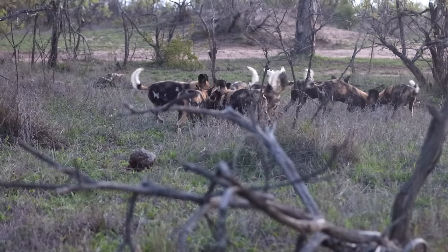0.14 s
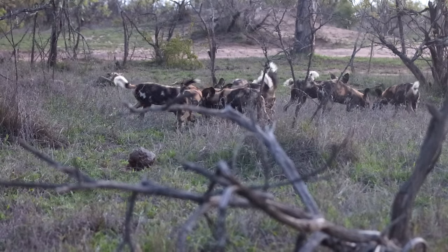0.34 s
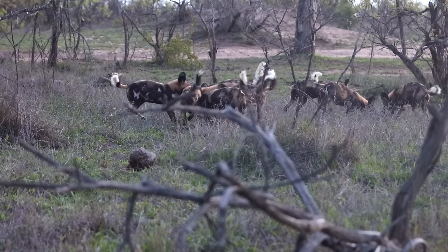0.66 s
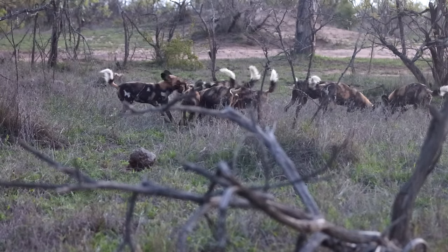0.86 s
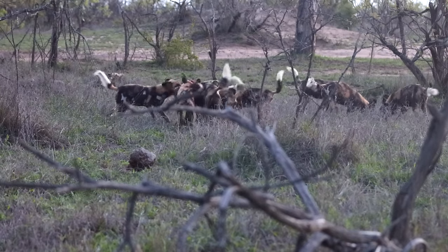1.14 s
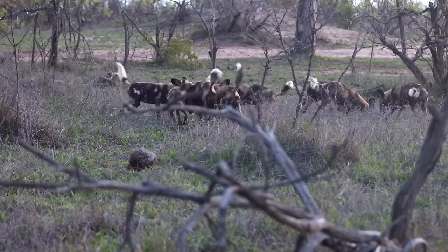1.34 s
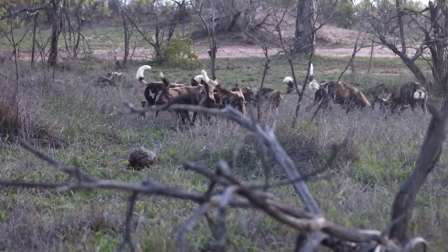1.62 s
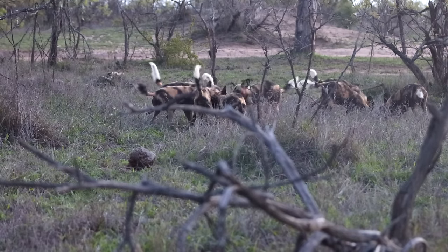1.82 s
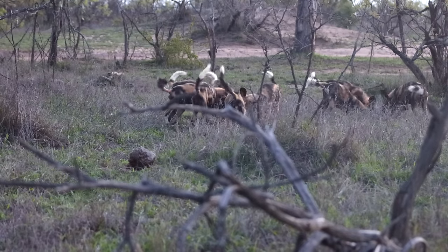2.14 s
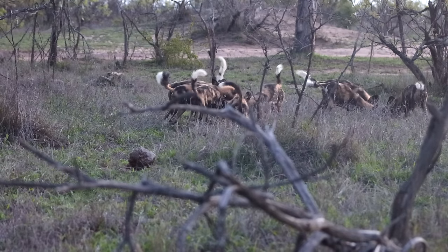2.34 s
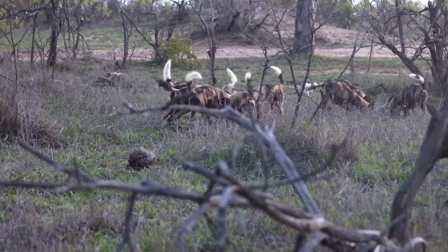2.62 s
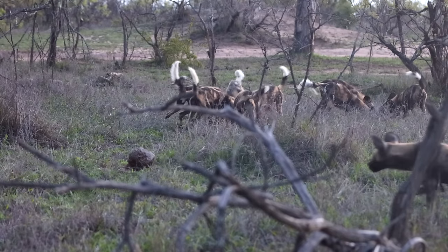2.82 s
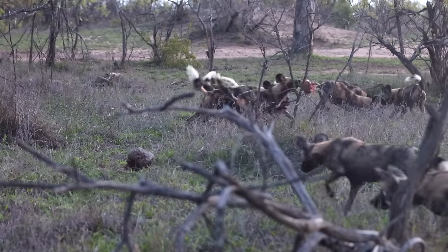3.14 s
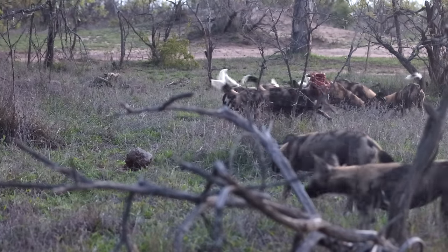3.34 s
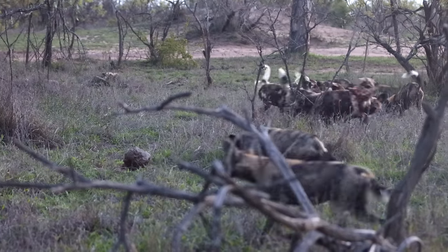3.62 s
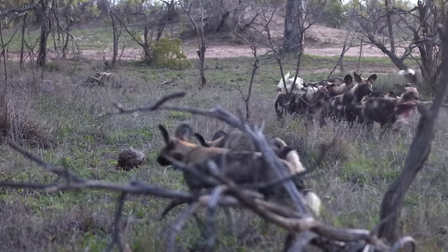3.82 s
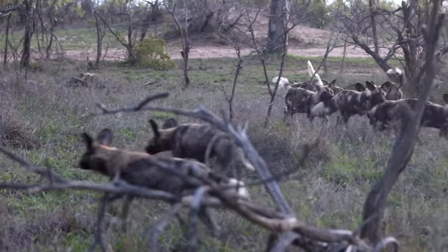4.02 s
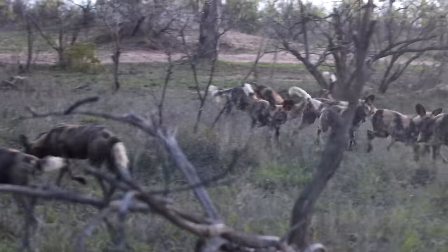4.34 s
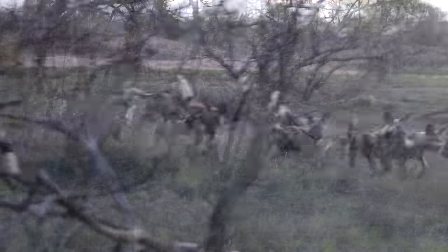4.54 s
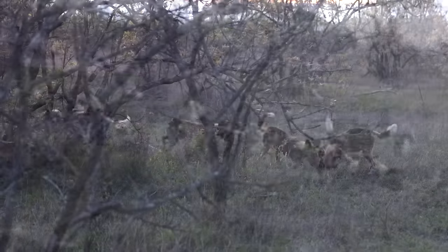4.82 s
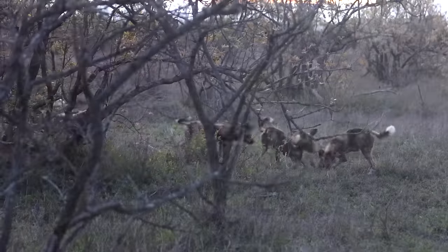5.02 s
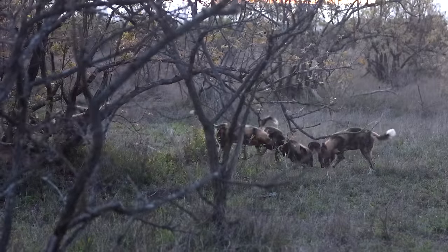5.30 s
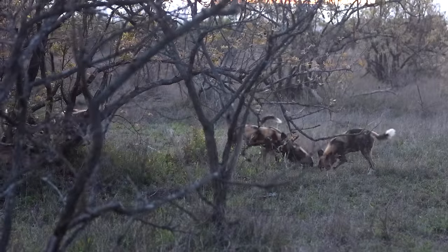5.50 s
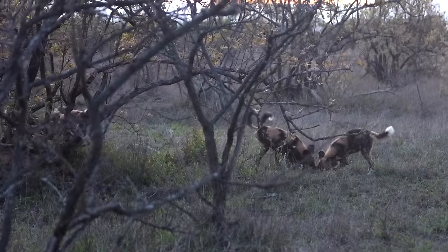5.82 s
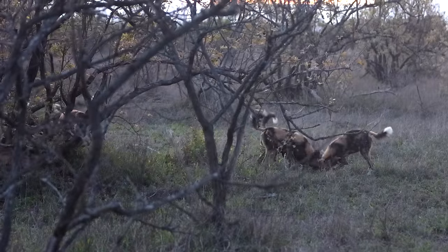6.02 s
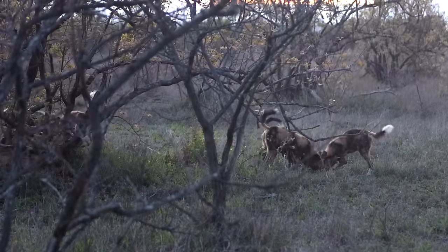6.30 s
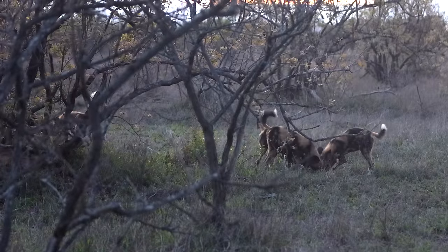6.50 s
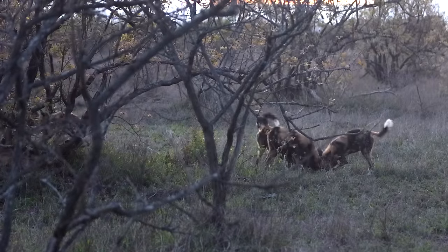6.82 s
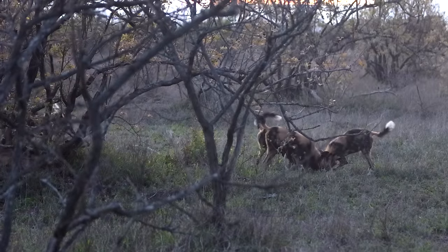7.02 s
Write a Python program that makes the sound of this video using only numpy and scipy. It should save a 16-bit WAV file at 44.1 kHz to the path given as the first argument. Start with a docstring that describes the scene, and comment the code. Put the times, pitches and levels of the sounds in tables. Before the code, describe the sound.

After a brief close knock and scrape, a wild dog pack bursts into frantic twittering and sharp squeals over crickets in dry bush, then calms.

```python
"""Dry bush, where a pack of wild dogs twitters over a kill: swooping whistles, short squeaks, a reedy whine.
Voices are gliding sines with overtones, near and echoed from the thicket; hoarse yelps are pulsed noise.
Grass, ground and snapping twigs are shaped noise; crickets trill in stroke pulses, and thin sines stand for
other insects. Near the start a loose part knocks as a set of decaying modes and scrapes as rough noise."""
import sys
import numpy as np
from scipy import signal
from scipy.fft import rfft, irfft, next_fast_len
from scipy.io import wavfile
from scipy.ndimage import map_coordinates

SR = 44100
rng = np.random.default_rng(int(sys.argv[2]) if len(sys.argv) > 2 else 0)


def wav_record(signal):
    """Record a signal, one row per channel, as 16-bit PCM in the file named by sys.argv[1]."""
    frames = np.transpose(np.atleast_2d(signal))
    bounded = np.clip(frames, -1, 1)
    # unit amplitude maps onto the largest positive 16-bit level
    quanta = np.round(bounded * 32767).astype(np.int16)
    wavfile.write(sys.argv[1], SR, quanta)


N = 315756
TIME = np.arange(N) / SR
TOP_HZ = 15800
ATTACK_S, RELEASE_S = 0.0043, 0.0042  # of every voiced piece


def amp(db):
    """Decibels to amplitude gain."""
    return 10 ** (np.asarray(db) / 20)


def unit(x):
    """Normalisation of x to rms 1."""
    return x / np.sqrt(np.mean(x ** 2) + 1e-20)


def along(points, hz):
    """Interpolation of (frequency, value) points on a logarithmic frequency axis."""
    f, v = np.transpose(points)
    return np.interp(np.log(hz + 1), np.log(f + 1), v)


def gains(rows):
    """Envelopes: one gain per sample for each level column after the time."""
    s, *columns = np.transpose(rows)
    return [amp(np.interp(TIME, s, column)) for column in columns]


def wobble(rate, size=N):
    """Random modulation: a smooth curve through rate random knots a second."""
    knots = rng.standard_normal(int(size * rate / SR) + 4)
    return map_coordinates(knots, [np.arange(size) * rate / SR])


def filtered(x, response):
    """Linear filtering: the spectrum of x times a response of frequency."""
    m = next_fast_len(N + SR // 2)
    return irfft(rfft(x, m) * response(np.fft.rfftfreq(m, 1 / SR)), m)[:N]


def noise(spectrum):
    """Coloured noise: white noise through a spectral envelope, at rms 1."""
    return unit(filtered(rng.standard_normal(N), lambda hz: amp(along(spectrum, hz))))


def band(centre_hz, width_hz, size):
    """Broad resonance: noise of rms 1 under a single spectral peak."""
    hz = np.fft.rfftfreq(size, 1 / SR)
    peak = 1 / (1 + (2 * (hz - centre_hz) / width_hz) ** 2)
    return unit(irfft(rfft(rng.standard_normal(size)) * peak, size))


def add(track, s, x):
    """Superposition: x joins the track from time s."""
    part = track[max(round(s * SR), 0):][:len(x)]
    part += x[:len(part)]


def bush(x, early_db=-12, tail_db=-15, count=24):
    """Reverberation: ground and near trunks return quick echoes; the thicket adds a short tail."""
    # decay of the thicket: (frequency [Hz], t60 [s])
    decay_times = [(200, 0.26), (2000, 0.31), (8000, 0.36), (15000, 0.38)]
    hz, t, z = signal.stft(rng.standard_normal(SR // 2), SR, nperseg=256)
    decay = amp(-60 * t / along(decay_times, hz)[:, None])
    tail = signal.istft(z * decay, SR, nperseg=256)[1]
    echo = amp(tail_db) * tail / np.linalg.norm(tail)
    delays = (rng.uniform(.001, .025, count) * SR).astype(int)
    echo[delays] += amp(early_db) * rng.choice([-1, 1], count) / np.sqrt(count)
    return x + signal.fftconvolve(x, echo)[:N]


def gate(t):
    """Onset and offset: the attack, hold and release of a voiced piece."""
    ramp = np.minimum((t - t[0]) / ATTACK_S, (t[-1] - t) / RELEASE_S)
    return np.sin(np.pi / 2 * np.clip(ramp, 0, 1)) ** 2


def swoop(length, first_hz, middle_hz, last_hz, db, swell_db):
    """Frequency glide: pitch and gain of a piece with one smooth bend, growing or fading evenly."""
    t = np.arange(0, length, 1 / SR)
    bend = np.polyfit([0, .5, 1], np.log([first_hz, middle_hz, last_hz]), 2)
    pitch = np.exp(np.polyval(bend, t / length))
    return pitch, amp(db) * unit(gate(t) * amp(swell_db * t / length))


def warble(knots):
    """Frequency modulation: pitch and gain along a swinging curve, as the larynx eases into each turn."""
    s, hz, db = np.transpose(sorted(knots))
    t = np.arange(s[0] - ATTACK_S / 2, s[-1] + RELEASE_S / 2, 1 / SR)
    place = np.interp(t, s, np.arange(len(s)))
    slope = np.diff(hz) / np.maximum(np.diff(s), 1e-4)
    # the pitch is level wherever it changes direction
    inner = 2 * np.maximum(slope[:-1] * slope[1:], 0) / (slope[:-1] + slope[1:] + 1e-9)
    turn = np.r_[slope[0], inner, slope[-1]]
    i = np.minimum(place.astype(int), len(s) - 2)
    u = place - i
    bend = (turn[i] - slope[i]) * (1 - u) - (turn[i + 1] - slope[i]) * u
    pitch = hz[i] + np.diff(s)[i] * u * (slope[i] + (1 - u) * bend)
    return pitch, gate(t) * amp(np.interp(t, s, db))


def voice(pitch, gain, overtones_db, jitter, jitter_rate, shimmer_db):
    """Source and filter: a trembling harmonic source whose overtones the mouth colours."""
    # resonance of the mouth: (frequency [Hz], level [dB])
    mouth_colour = [(1000, 2), (2800, 2.5), (4300, 7), (6300, 3.5), (8300, 4.5), (10500, -7), (13000, 1.5),
                    (15500, -11)]
    pitch = pitch * (1 + jitter * wobble(jitter_rate, len(pitch)))
    phase = 2 * np.pi * np.cumsum(pitch) / SR

    def flutter():
        """Shimmer: random amplitude modulation of one partial."""
        return amp(shimmer_db * wobble(jitter_rate, len(pitch)))

    out = np.sin(phase) * flutter()
    for k, level in enumerate(overtones_db, 2):
        colour = amp(level + along(mouth_colour, k * pitch))
        out += colour * flutter() * np.sin(k * phase) * (k * pitch < SR / 2)
    return np.sqrt(2) * out * gain


def excitement(s):
    """Arousal: how far the pack is above calm at time s, in dB."""
    # excitement of the pack: (time [s], level [dB])
    arousal = [(0, -70.5), (2.9, -61.5), (3.25, -47), (3.8, -43), (4.35, -41), (4.55, -47.5), (5.2, -49.5),
               (5.5, -63.5), (7.16, -62)]
    calm_db = -58
    return np.interp(s, *np.transpose(arousal)) - calm_db


def air_stir():
    """Low-frequency noise: a slowly varying stir of the air."""
    # strength of the stir: (time [s], level [dB])
    stir_levels = [(0, -53), (.28, -48.5), (.45, -54.5), (1.5, -65), (3.9, -56), (4.2, -54.5), (5.4, -52.5),
                   (7.16, -51)]
    # its spectrum: (frequency [Hz], relative level per Hz [dB])
    stir_spectrum = [(12, -44), (20, 8), (49, -2.5), (118, 3), (188, -0.5), (260, -6), (350, -7),
                     (460, -17), (770, -120)]
    return gains(stir_levels)[0] * noise(stir_spectrum)


def scuffle(grain_db=2, thud_db=-1, thud_rate=70, thud_t60=0.022, body_db=-7, body_hz=95):
    """Friction and impact: stalks brush the dogs; paws stir the ground and land in irregular dull thuds."""
    # activity of the pack: (time [s], grass swish level [dB], trampling level [dB])
    activity = [(0, -45.5, -50.5), (.6, -53, -53), (1, -47, -52), (1.25, -54, -53), (2.1, -52, -52),
                (2.5, -53, -52.5), (3.35, -50, -53.5), (4, -51, -50), (4.3, -42, -49.5), (4.55, -47, -50),
                (4.85, -51, -55), (5.5, -54.5, -55), (6.5, -52, -51.5), (7.16, -53.5, -52.5)]
    # spectra of the grass and of the stirred ground: (frequency [Hz], relative level per Hz [dB])
    grass_spectrum = [(800, -38), (1500, 0.5), (1950, 0), (2900, -4), (4800, -4), (6500, -8), (8500, -5.5),
                      (10500, -12.5), (13500, -10), (15800, -10.5)]
    ground_spectrum = [(88, -9.5), (150, -8), (188, 4), (225, -6), (454, -10), (900, -8), (1830, -11),
                       (3150, -24), (3500, -14.5), (4550, -16.5), (7700, -120)]
    swish, tread = gains(activity)
    stalks = unit(noise(grass_spectrum) * amp(grain_db * wobble(500) + wobble(25)))
    steps = (rng.random(N) < thud_rate / SR) * rng.uniform(0.084, 1, N)
    earth = band(327, 520, N) + amp(body_db) * band(body_hz, 60, N)
    decay = amp(-60 * np.arange(SR // 10) / SR / thud_t60)
    thuds = unit(signal.fftconvolve(steps, decay)[:N] * earth)
    # the harder the trampling, the more the thuds stand out
    weight = (tread / tread.max()) ** 2
    return swish * stalks + tread * (noise(ground_spectrum) + amp(thud_db) * weight * thuds)


def chirps(cycle, pitch_hz, sweep, jitter):
    """Stridulation: one wing stroke a cycle, each falling in pitch."""
    u = cycle % 1
    pitch = pitch_hz * (1 + sweep * (.5 - u) + jitter * wobble(400, len(u)))
    return unit(np.sin(np.pi * u) ** 4 * np.sin(2 * np.pi * np.cumsum(pitch) / SR))


def crickets(stroke_rate=33.5, chorus_db=-53.0, bout_db=1.5, count=5):
    """Stridulation in chorus: far crickets rise and fall in a narrow band; nearer ones trill in bouts."""
    # near trills: (first chirp [s], last chirp [s], pitch [Hz], level before the swell [dB])
    near_trills = [(0.396, 0.495, 4040, -52.5), (0.667, 0.837, 4420, -52.5), (0.929, 1.045, 4110, -52.5),
                   (1.127, 1.27, 4170, -62), (1.549, 1.719, 4220, -57), (2.101, 2.19, 4020, -51),
                   (2.654, 2.743, 4050, -50), (2.754, 2.929, 4450, -50.5), (3.151, 3.294, 4040, -51.5),
                   (5.032, 5.152, 4430, -51), (5.17, 5.236, 4020, -45.5), (5.764, 5.823, 3930, -44),
                   (6.315, 6.428, 3940, -42.5), (6.883, 6.995, 4015, -42.5), (7.035, 7.16, 4430, -51)]
    # the common pitch; a near singer starts there and glides to its own
    chorus_hz, glide_s = 3968, 0.033

    def singer():
        """Stridulation of one far cricket, its pitch and loudness wandering."""
        cycle = stroke_rate * rng.uniform(.92, 1.12) * TIME + wobble(2)
        song = chirps(cycle, chorus_hz * (1 + .021 * wobble(9)), sweep=.16, jitter=.024)
        return song * amp(bout_db * np.tanh(wobble(4.6)))

    out = amp(chorus_db) * unit(sum(singer() for _ in range(count)))
    for first, last, pitch_hz, db in near_trills:
        # the higher singers stroke faster
        gaps = round((last - first) * stroke_rate * (pitch_hz / 4000) ** 3)
        rate = gaps / (last - first)
        cycle = np.arange(0, gaps + 1, rate / SR)
        swell = np.sin(np.pi * (cycle / (gaps + 1)) ** 1.4) ** .3
        pitch = pitch_hz + (chorus_hz - pitch_hz) * np.exp(-cycle / rate / glide_s)
        strokes = chirps(cycle, pitch, sweep=.2, jitter=.01)
        add(out, first - .5 / rate, amp(db) * swell * strokes)
    return out


def far_twitters(pitch_hz=6900, spread=.2, bend=0.21, length=.022, overtone_db=-9, level_db=-66,
                 scatter_db=3.5, swell_db=10):
    """Random point process: dogs further back whistle oftener and louder as the pack grows excited."""
    calls_per_s, doubling_db = 10, 5  # rate when calm; each such rise in excitement doubles it
    out = np.zeros(N)
    due = np.cumsum(calls_per_s * 2 ** (excitement(TIME) / doubling_db)) / SR
    draws = rng.standard_normal((600, 8))
    for k, (late, size, loud, swell, high, *turns) in enumerate(draws[:int(due[-1])]):
        s = np.interp(k + .5 + late / 2, due, TIME)
        pitches = np.minimum(pitch_hz * np.exp(spread * high + bend * np.array(turns)), TOP_HZ)
        db = level_db + excitement(s) + scatter_db * loud
        shape = swoop(length * np.exp(size / 4), *pitches, db, swell_db * swell)
        call = voice(*shape, [overtone_db], jitter=0.012, jitter_rate=276, shimmer_db=3.0)
        add(out, s - length / 2, call)
    return out


def snaps(cycles=22):
    """Damped resonance: twigs and paws crack and die within a few hundredths of a second, the higher the sooner."""
    # twigs snapping and paws striking: (time [s], nominal peak level [dB], centre [Hz], width [Hz])
    cracks = [(.183, -17, 3680, 1200), (1.948, -35, 1490, 2500), (2.041, -31, 12000, 6000),
              (2.76, -26.5, 1400, 2500), (3.0508, -20, 4000, 2760), (3.986, -34, 980, 500),
              (.404, -32, 11200, 2000), (4.068, -27, 1770, 4050), (4.254, -36, 480, 500),
              (4.287, -38.5, 606, 800), (4.505, -30, 800, 895), (4.353, -16, 7000, 7900),
              (4.352, -30.5, 328, 450), (4.566, -30, 1010, 1400), (5.248, -28.5, 1290, 2000),
              (5.249, -34, 7000, 9000), (5.802, -35, 10500, 5000), (5.986, -34.5, 450, 900),
              (6.885, -34.5, 845, 1200)]
    out, t = np.zeros(N), np.arange(SR // 10) / SR
    for s, db, centre_hz, width_hz in cracks:
        t60 = cycles / centre_hz + 0.012
        add(out, s, amp(db - 6.5 - 60 * t / t60) * band(centre_hz, width_hz, len(t)))
    return out


def knocks(attack=0.00033):
    """Modal vibration and friction: a loose part strikes and slides; its shifting grip bends the ring."""
    # blows: (time [s], nominal peak level [dB], added level of the main mode [dB], of the second mode [dB])
    blows = [(0.1834, -17.5, -21, -2), (0.2224, -17.5, -18, -1), (0.2266, -22.5, -18, 6),
             (.233, -22, -8, -5), (.268, -17, -11, -8), (0.272, -11, 5.5, -3), (0.2965, -22, -6, 5),
             (0.319, -36, -1, 11)]
    # modes of the part: (frequency [Hz], relative level [dB], t60 [s])
    modes = [(1134, -3, 0.04), (2440, -11.5, 0.028), (188, -15, 0.093), (270, -23.5, 0.076),
             (830, -17, 0.039), (1280, -8.5, 0.018), (1550, -5, 0.043), (3200, -17, 0.033),
             (3820, -19, 0.022)]
    # spectrum of the scrape: (frequency [Hz], relative level per Hz [dB])
    scrape_spectrum = [(35, -50), (60, -15), (188, -2), (406, -15), (816, -11), (1300, -2.5), (1800, -11),
                       (2740, -11), (4000, -14), (15800, -18)]
    slide_from_s, slide_to_s, slide_db, slide_t60_s = .184, 0.28, -35, 0.28
    out, t = np.zeros(N), np.arange(SR // 5) / SR
    for s, db, *leading_db in blows:
        strengths_db = rng.normal(0, 1.5, len(modes))
        strengths_db[:len(leading_db)] = leading_db
        grip = 1 + .015 * wobble(150, len(t))
        ring = np.zeros(len(t))
        for extra, (hz, level, t60) in zip(strengths_db, modes):
            ring += amp(level + extra - 60 * t / t60) * np.sin(2 * np.pi * hz * np.cumsum(grip) / SR)
        crack = amp(-11 - 60 * t / 0.01) * band(2600, 6000, len(t))
        add(out, s, amp(db) * (ring * (1 - np.exp(-t / attack)) + crack))
    fade_db = -60 * np.maximum(TIME - slide_to_s, 0) / slide_t60_s
    sliding = (TIME > slide_from_s) * amp(slide_db + fade_db)
    return out + sliding * unit(noise(scrape_spectrum) * amp(2.1 * wobble(1100)))


def rasps(pulse_rate=105):
    """Pulsed turbulence and friction: rough bursts swell and fade in uneven pulses that start sharply."""
    # hoarse yelps, scuffles, low thumps and a scrape after the knocks:
    # (middle [s], length at half height [s], centre [Hz], width [Hz], level [dB])
    bursts = [(0.361, .07, 1840, 1300, -46.5), (1.87, 0.052, 1460, 1000, -48.5),
              (1.963, 0.026, 1460, 1420, -43), (2.084, 0.059, 1700, 900, -44.5),
              (3.102, 0.035, 2720, 1870, -44), (3.391, 0.069, 2030, 1620, -37.5),
              (3.368, 0.029, 341, 130, -44), (3.591, 0.04, 1440, 1180, -39),
              (3.855, 0.05, 1530, 450, -38.5), (4.134, 0.12, 1170, 1200, -40.5),
              (4.157, 0.035, 344, 500, -42), (4.277, 0.033, 450, 450, -42), (4.355, 0.046, 3350, 4500, -35),
              (4.39, 0.041, 360, 500, -42), (4.385, .06, 1630, 1400, -42), (4.52, 0.028, 550, 1300, -42.5),
              (4.641, 0.02, 660, 1500, -45), (4.63, 0.12, 2560, 1800, -48.5),
              (4.709, 0.015, 500, 1000, -48), (4.83, 0.037, 237, 260, -47), (4.939, 0.012, 1780, 700, -37),
              (6.395, 0.058, 342, 200, -44.5), (6.587, 0.074, 1590, 500, -48.5)]
    out = np.zeros(N)
    for s, length, centre_hz, width_hz, db in bursts:
        size = int(2 * length * SR)
        cycle = np.cumsum(pulse_rate * np.exp(wobble(pulse_rate, size) / 2)) / SR
        pulses = amp(-15 * (cycle % 1))
        burst = unit(band(centre_hz, width_hz, size) * pulses)
        add(out, s - length, amp(db) * np.hanning(size) * burst)
    return out


def twitters(overtone_db=-18.0, third_db=-6, hoarse_db=-16, warble_db=-3.5):
    """Frequency-modulated whistles of near and deeper dogs: they flutter, and turbulence frays them."""
    # pieces of whistles, some running on into the next, one a bright overtone:
    # (time [s], length [s], first pitch [Hz], middle pitch [Hz], last pitch [Hz],
    # level [dB], swell over the length [dB])
    whistle_pieces = [(1.125, 0.08, 7360, 10160, 8880, -52, -24), (1.244, 0.06, 6640, 6920, 6700, -55, -11),
                      (1.961, 0.015, 3900, 4900, 6600, -47, 13), (1.98, 0.063, 6400, 6840, 7000, -53, -2),
                      (2.112, 0.042, 6600, 5170, 4220, -48.5, -7),
                      (2.151, 0.027, 4020, 5080, 5900, -50, -7),
                      (2.556, 0.047, 6810, 6740, 6440, -52.5, 11),
                      (2.881, 0.031, 5270, 5630, 6160, -49.5, 11),
                      (3.057, 0.018, 5300, 4240, 3610, -41.5, 0),
                      (3.101, 0.018, 3780, 4740, 8900, -39.5, -10),
                      (3.116, 0.0216, 9100, 8360, 8560, -40.5, 10),
                      (3.167, 0.043, 7000, 6400, 8350, -44, 19), (3.216, 0.032, 8000, 6300, 7220, -42, 1),
                      (3.26, 0.038, 7330, 5570, 5520, -38.5, 1), (3.32, 0.028, 6400, 4580, 4280, -39.5, -5),
                      (3.391, 0.015, 8300, 8100, 9180, -38.5, 6),
                      (3.408, 0.021, 7850, 5950, 3940, -32.5, -10),
                      (3.457, 0.027, 5420, 4200, 5400, -37.5, 9),
                      (3.511, 0.037, 6060, 4720, 4000, -40.5, 9),
                      (3.563, 0.05, 4270, 4620, 4320, -37.5, -6),
                      (3.637, 0.035, 7520, 5070, 6350, -34.5, 16),
                      (3.663, 0.039, 5580, 6440, 4640, -39.5, -16),
                      (3.788, 0.019, 9700, 7800, 6170, -41, -4),
                      (3.777, 0.045, 12600, 13400, 11900, -33.5, 5),
                      (3.807, 0.03, 8700, 5680, 4900, -35, 6), (3.818, 0.066, 4370, 4036, 5800, -33, -13),
                      (4.004, 0.02, 7700, 5330, 6990, -35.5, 16), (4.026, 0.02, 6800, 8140, 6300, -28, -7),
                      (4.048, 0.018, 4550, 4380, 5640, -36, -4), (4.084, 0.028, 8600, 5440, 3740, -36, -3),
                      (4.308, 0.018, 5580, 8670, 14910, -29, -20),
                      (4.355, 0.022, 4300, 5300, 6460, -32, -4),
                      (4.385, 0.035, 6430, 10250, 6840, -36.5, -11),
                      (4.415, 0.021, 5400, 4360, 6000, -27, 3),
                      (4.417, 0.022, 7330, 6140, 10500, -28.5, 13),
                      (4.418, .018, 15200, 12400, 15300, -32.5, 2),
                      (4.447, 0.028, 8230, 8200, 5750, -40, -3),
                      (4.532, 0.017, 12700, 11700, 11100, -45.5, 3),
                      (4.557, 0.027, 4900, 4570, 4680, -44.5, -2), (4.618, 0.011, 5540, 5260, 6800, -38, 2),
                      (4.584, 0.014, 4300, 5800, 10000, -43, -2), (4.597, 0.021, 9900, 8360, 9700, -30, 12),
                      (4.632, 0.01, 5240, 5000, 5200, -36.5, 0),
                      (4.646, 0.012, 5100, 5120, 6100, -31.5, -6),
                      (4.647, 0.033, 7260, 9080, 8550, -29.5, 6),
                      (4.676, 0.013, 8640, 4950, 4000, -35.5, -9),
                      (4.686, 0.0248, 4070, 3920, 4240, -33.5, 12),
                      (4.703, 0.018, 6800, 7800, 12090, -42, -7), (4.738, 0.02, 8400, 6270, 7700, -39, -14),
                      (4.772, 0.043, 6770, 14300, 12500, -36, -27),
                      (4.816, 0.021, 6450, 4350, 4740, -38, 8.5),
                      (4.915, 0.012, 8100, 7240, 8500, -42.5, 0), (4.97, 0.018, 4820, 4700, 7800, -46, -5),
                      (5.048, 0.11, 7480, 8900, 8000, -59, -4), (5.18, 0.016, 8670, 7640, 5810, -49, -8),
                      (5.205, 0.05, 8300, 7900, 8540, -57, 3), (5.668, 0.059, 7100, 7500, 6900, -59.5, -1),
                      (5.285, .016, 8100, 7400, 6700, -52.5, 2), (5.785, .024, 6650, 5700, 4800, -56, 3),
                      (6.088, .032, 5300, 5650, 4850, -56, 2.5), (5.92, 0.033, 5770, 4770, 4400, -43.5, -8),
                      (5.968, 0.05, 3840, 5180, 7000, -52, -26),
                      (6.292, 0.015, 6330, 5240, 4130, -39.5, -4.5),
                      (6.333, 0.012, 3760, 5400, 6350, -31, -7), (6.342, 0.054, 6060, 6920, 6700, -44, -13),
                      (6.469, 0.04, 6110, 8250, 6400, -47, -3), (6.507, 0.022, 6000, 7740, 8290, -46, 0.5),
                      (6.577, 0.057, 8340, 8670, 8100, -46.5, -21)]
    # swinging whistles as curves; one long call runs through two of them:
    # (time [s], pitch [Hz], level before warble_db [dB])
    whistle_curves = [
        [(1.997, 7590, -44), (2.009, 8840, -24.5), (2.027, 10400, -53), (2.038, 7300, -33), (2.045, 5030, -26),
         (2.06, 5430, -30), (2.078, 6750, -31.5), (2.112, 7030, -36)],
        [(3.298, 10200, -40), (3.322, 6160, -44), (3.344, 9000, -34), (3.365, 12100, -35.5), (3.378, 8900, -43),
         (3.4, 4300, -35)],
        [(3.601, 13000, -41), (3.61, 7000, -26), (3.622, 4550, -34), (3.7, 4200, -44), (3.73, 4700, -28.5),
         (3.755, 4400, -31), (3.772, 5650, -23), (3.785, 7500, -36)],
        [(3.897, 4500, -27), (3.906, 7500, -20.5), (3.913, 6280, -27), (3.921, 9520, -21.5),
         (3.944, 8600, -25.5), (3.956, 6860, -27)],
        [(4.102, 6370, -31), (4.113, 5950, -26.5), (4.13, 7530, -26.5), (4.147, 3990, -24), (4.175, 5400, -33)],
        [(4.114, 6950, -30), (4.125, 8300, -21), (4.14, 10100, -25), (4.153, 8250, -24), (4.163, 7100, -23),
         (4.171, 7980, -10), (4.175, 8900, -28)],
        [(4.177, 12300, -21), (4.187, 14000, -33), (4.203, 14500, -47), (4.216, 13500, -27),
         (4.224, 8200, -17.5), (4.231, 6230, -29), (4.24, 5670, -21.5), (4.253, 4940, -24.5), (4.27, 4070, -40),
         (4.3, 4100, -44)],
        [(4.296, 7520, -48.5), (4.307, 5810, -23), (4.315, 6320, -21), (4.321, 8320, -15), (4.325, 13540, -24),
         (4.333, 12560, -30), (4.345, 7200, -24)],
        [(4.437, 4400, -29), (4.462, 4030, -40), (4.477, 4000, -24), (4.487, 4400, -40), (4.494, 5500, -26)],
        [(4.84, 4570, -36), (4.852, 7700, -27), (4.862, 5090, -29.5), (4.876, 4120, -41), (4.887, 6240, -31),
         (4.896, 9070, -21), (4.905, 6880, -53), (4.915, 4400, -37)],
    ]
    pressed = 0.3  # dB of overtones per dB of excitement: excited dogs press their voices
    faint_db = -38  # whistles weaker than this come mostly from dogs deeper in the bush
    near, deep = np.zeros((2, N))
    pieces = [(s, 0, swoop(*shape)) for s, *shape in whistle_pieces]
    pieces += [(knots[0][0] - ATTACK_S / 2, warble_db, warble(knots)) for knots in whistle_curves]
    for s, db, (pitch, gain) in pieces:
        second_db = overtone_db + pressed * excitement(s)
        overtones_db = [second_db, second_db + third_db]
        whistle = voice(pitch, gain, overtones_db, jitter=.0095, jitter_rate=300, shimmer_db=2.8)
        whistle = amp(db) * whistle
        depth = 1 / (1 + gain.max() / amp(faint_db))
        add(near, s, (1 - depth) * whistle)
        add(deep, s, depth * whistle)
    return np.array([near, deep]) * (1 + amp(hoarse_db) * wobble(2500))


def squeals(fall_db=-11, whine_db=-2, whine_fall_db=-1.8):
    """Harmonic series: clean lower voices have a few overtones, the reedy whine many."""
    # squeaks, held notes and the falling overtone of one squeak:
    # (time [s], length [s], first pitch [Hz], middle pitch [Hz], last pitch [Hz],
    # level [dB], swell over the length [dB], overtone level [dB])
    clean_voices = [(1.217, 0.13, 2224, 2120, 2130, -59, -8, -22),
                    (3.295, 0.053, 1425, 1440, 1780, -33.5, 5, -22),
                    (3.485, 0.038, 1820, 1650, 1480, -43.5, -15, -25),
                    (3.547, 0.046, 1798, 1827, 1430, -34, -1, -8),
                    (3.773, 0.048, 1703, 1690, 1583, -40, -2, -12),
                    (3.914, 0.03, 820, 942, 810, -31.5, 7, -7),
                    (4.174, 0.038, 1972, 2053, 2035, -16.5, 9.5, -14),
                    (4.321, 0.03, 1780, 1850, 1405, -19.5, -17, -12),
                    (4.322, 0.031, 1930, 1428, 1110, -28, -16, -25),
                    (4.339, 0.015, 3060, 2380, 1960, -23, 12, -7.5),
                    (4.433, 0.026, 1366, 1416, 1030, -32.5, -23, -12),
                    (4.667, 0.0137, 1060, 980, 864, -39, 3.5, -7.5),
                    (4.791, 0.025, 2160, 1550, 1040, -34, -9, -17),
                    (4.888, 0.014, 1580, 1420, 1240, -40, -15, -15),
                    (4.922, 0.019, 1145, 1120, 1050, -45.5, 0.5, -13),
                    (5.112, 0.065, 643, 668, 636, -55, -2, -25),
                    (6.49, 0.013, 950, 850, 785, -45.5, 5, -18),
                    (6.585, 0.021, 856, 817, 760, -48.5, 4, -6)]
    # reedy whine: the same columns without the overtone level
    reedy_whine = [(3.524, .073, 622, 755, 831, -45, -2), (3.575, .04, 556, 610, 746, -45, 0)]
    out = np.zeros(N)
    for s, *shape, overtone_db in clean_voices:
        overtones_db = overtone_db + fall_db * np.arange(4)
        add(out, s, voice(*swoop(*shape), overtones_db, jitter=.005, jitter_rate=300, shimmer_db=1.2))
    for s, *shape in reedy_whine:
        overtones_db = whine_db + whine_fall_db * np.arange(11)
        add(out, s, voice(*swoop(*shape), overtones_db, jitter=0.0096, jitter_rate=290, shimmer_db=2.0))
    return out


def two_voiced(whistle, squeal, depth_db=-5, knee_db=-42):
    """Amplitude modulation: a squeal shakes a simultaneous whistle at its pitch, giving it side tones."""
    vibration = squeal / (np.abs(signal.hilbert(squeal)) + amp(knee_db))
    return whistle * (1 + amp(depth_db) * vibration)


def insect_tones():
    """Sustained oscillation: thin steady lines swell in, hold and fade away."""
    # insect tones: (frequency [Hz], middle of fade-in [s], middle of fade-out [s], level [dB])
    steady_lines = [(4350, 2.812, 3.197, -44), (4220, 3.3, 3.6, -50), (10300, 2.937, 3.6, -48),
                    (3250, 2.92, 3.55, -57)]
    fade_s = 0.094
    out = np.zeros(N)
    for hz, start, end, db in steady_lines:
        swell = np.clip(np.minimum(TIME - start, end - TIME) / fade_s + .5, 0, 1)
        phase = 2 * np.pi * hz * TIME + 0.13 * wobble(40)
        out += np.sqrt(2) * amp(db) * swell * np.sin(phase)
    return out


def scene():
    """Superposition: pack and crickets echo in the bush, far dogs more so; the other layers stay dry."""
    low = squeals()
    near, deep = twitters()
    pack = bush(two_voiced(near, low) + low + rasps()) + snaps()
    # echoes are stronger deeper in the bush
    far = two_voiced(deep, low) + far_twitters()
    far = bush(far, early_db=-12.5, tail_db=-6.5)
    insects = bush(crickets()) + insect_tones()
    return (pack + far + scuffle() + insects + knocks() + air_stir())[None]


def record(dry):
    """Band limitation: nothing passes at or above the top frequency."""
    return filtered(dry[0], lambda hz: hz < TOP_HZ)[None]


dry = scene()
out = record(dry)
wav_record(out)
```